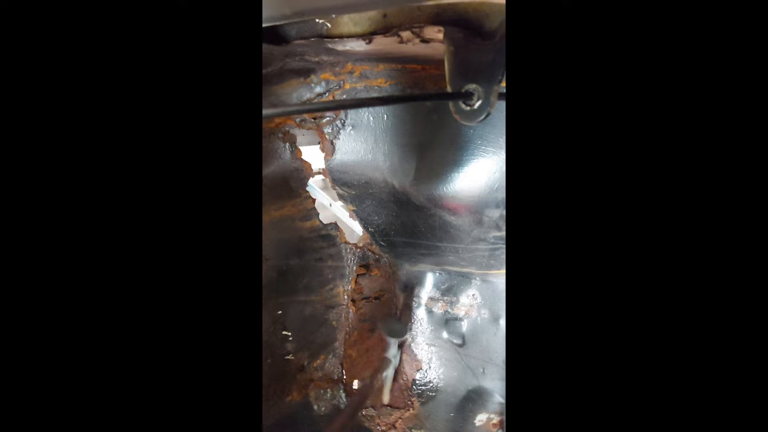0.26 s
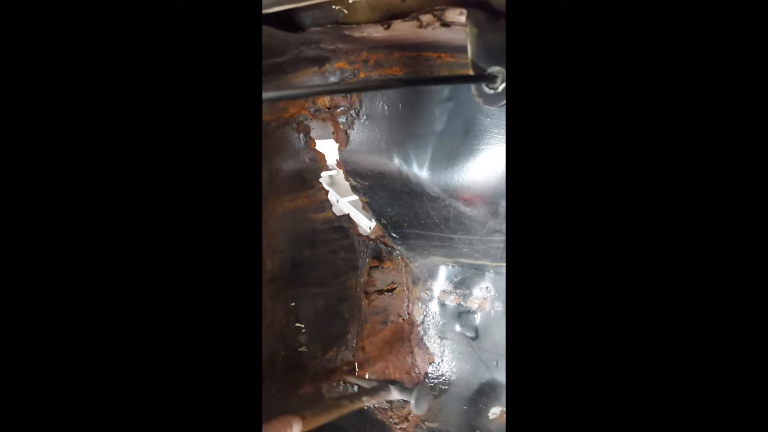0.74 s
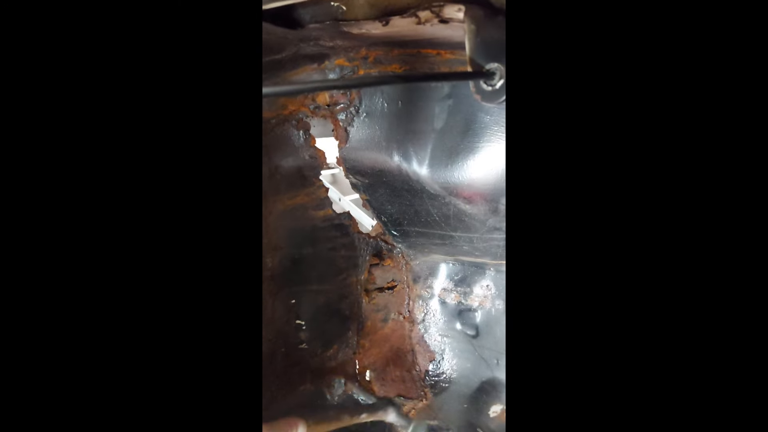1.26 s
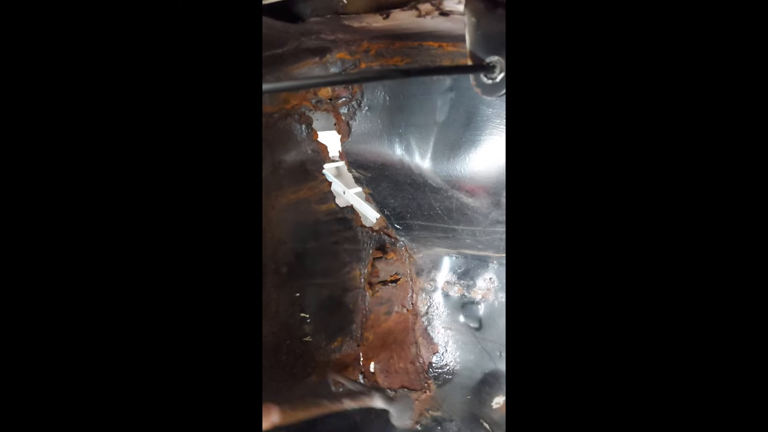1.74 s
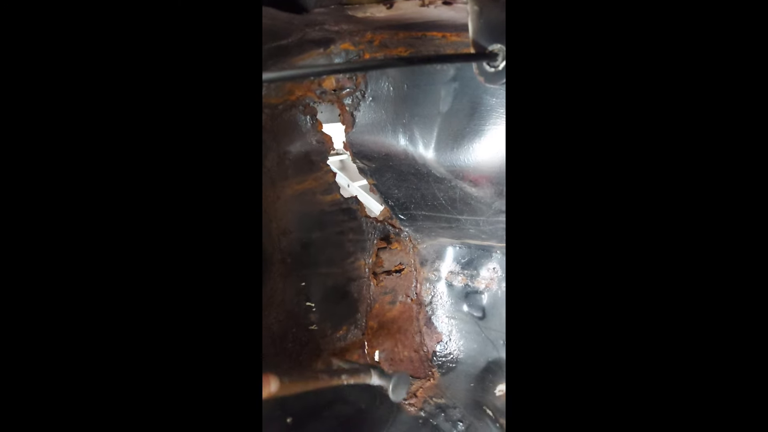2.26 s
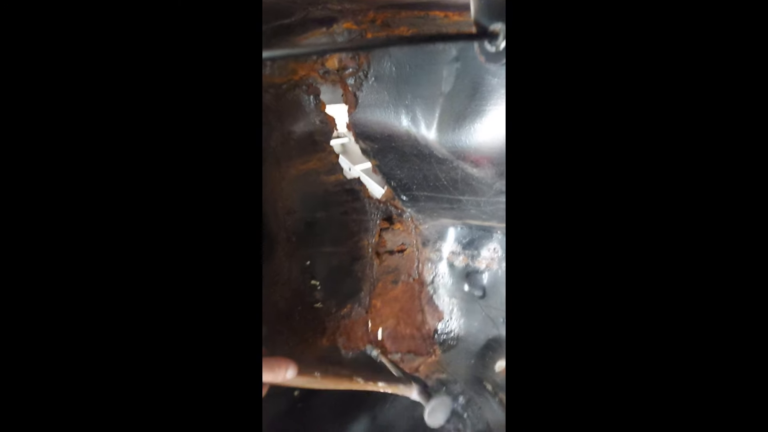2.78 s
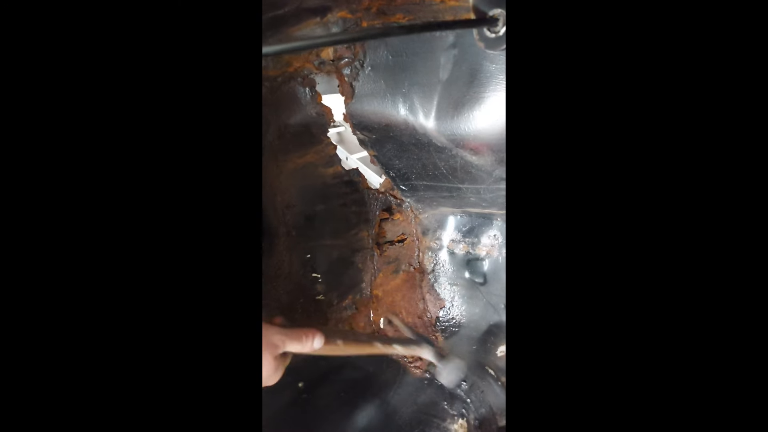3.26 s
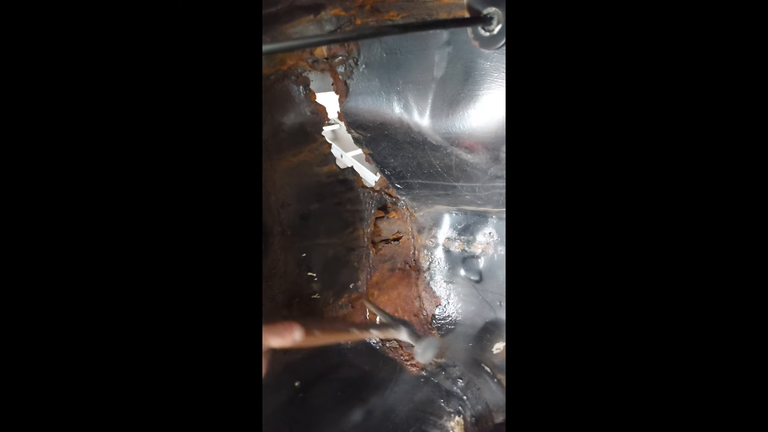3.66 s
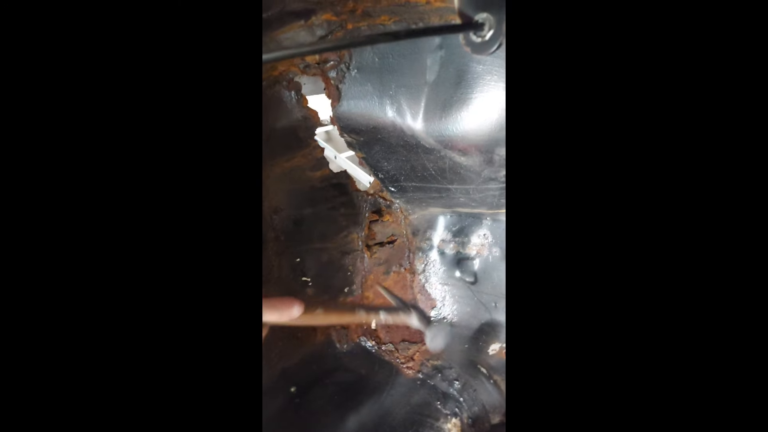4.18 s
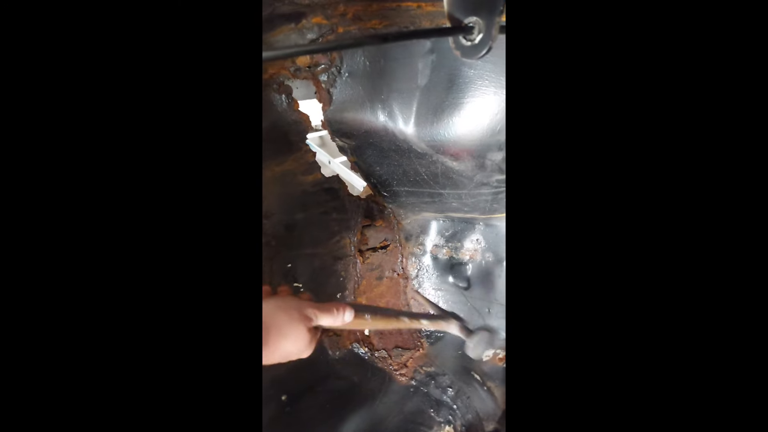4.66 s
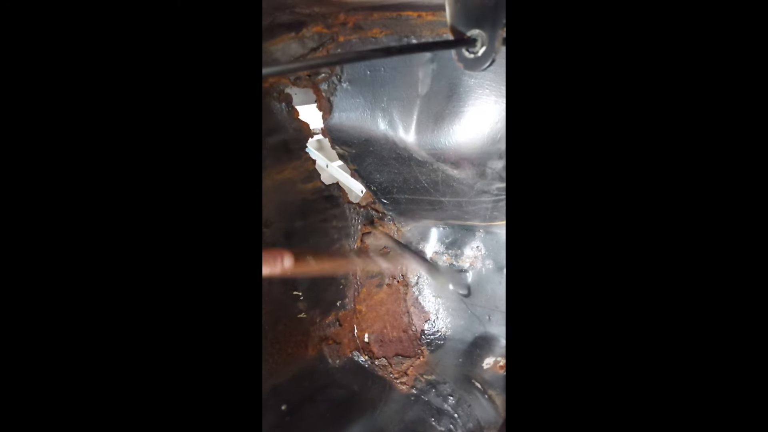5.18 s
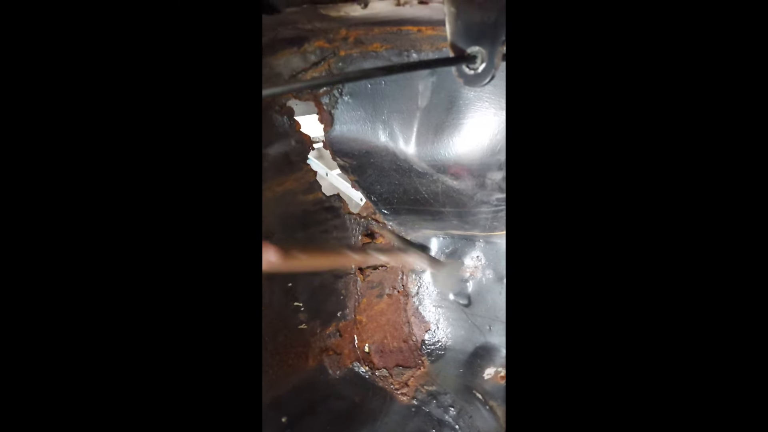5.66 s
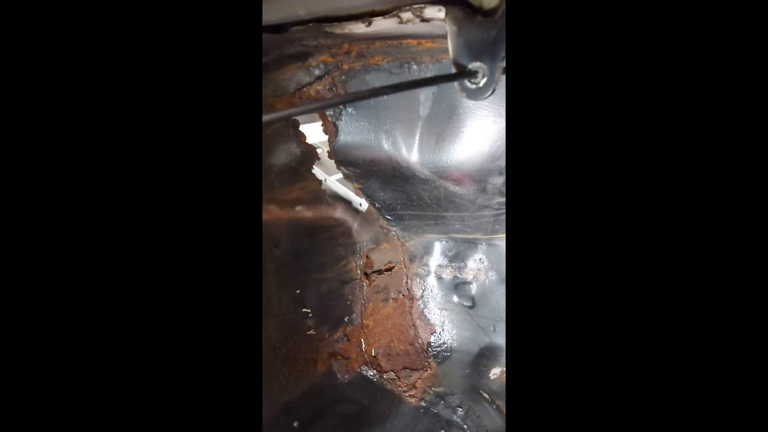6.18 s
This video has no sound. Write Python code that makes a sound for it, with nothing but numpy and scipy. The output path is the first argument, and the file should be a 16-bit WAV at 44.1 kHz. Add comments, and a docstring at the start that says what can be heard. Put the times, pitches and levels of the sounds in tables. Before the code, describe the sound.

A small hammer taps quickly on a rusty steel car panel, each blow cracking and booming, with one short pause and rust trickling down.

```python
"""First you hear a small hammer tap a rusted steel car panel, close by, over a workshop hiss.
It taps about four times a second, with one pause. Each blow cracks, clatters in the corroded sheet
and booms in the car body; loosened rust trickles down. The hiss stops and comes back with a low hum.
Loud blows make an automatic volume control duck the whole sound, and they overload its limiter."""
import sys
import numpy as np
from scipy import signal
from scipy.fft import rfft, irfft, next_fast_len
from scipy.io import wavfile
from scipy.ndimage import uniform_filter1d, minimum_filter1d

SR = 44100
rng = np.random.default_rng(int(sys.argv[2]) if len(sys.argv) > 2 else 0)


def master(y):
    """Save y as 16-bit WAV."""
    cut = np.clip(np.atleast_2d(y).T, -1, 1)
    pcm = np.round(cut * 32767)  # scale
    wavfile.write(sys.argv[1], SR, pcm.astype(np.int16))


N = 283122
TIME = np.arange(N) / SR
AGE = np.arange(26460) / SR  # seconds since one short sound began
ATTACK = AGE < .05
BINS = np.fft.rfftfreq(32768, 1 / SR)  # the frequencies at which filters are set


def amp(db):
    """Turns decibels into a gain."""
    return 10 ** (np.asarray(db) / 20)

def rms(x):
    """The average strength of a signal."""
    return np.sqrt(np.mean(x ** 2) + 1e-20)

def at_pitch(points, hz):
    """Looks up a table between its rows, on a log frequency scale."""
    f, value = np.transpose(points)
    return np.interp(np.log(hz + 1), np.log(f + 1), value)

def envelope(curve):
    """Turns rows of time and level into a gain for every sample."""
    return amp(np.interp(TIME, *np.transpose(curve)))

def add(mix, start_s, sound):
    """Mixes in a short stereo sound and fades out its end."""
    fade = np.minimum((AGE[-1] - AGE) / .2, 1)
    part = mix[:, max(round(start_s * SR), 0):][:, :len(AGE)]
    part += (sound * fade)[:, :part.shape[1]]

def colour(x, db):
    """Filters by one level for each of BINS, with no ringing ahead of the sound."""
    log_gain = np.log(amp(np.concatenate([db, db[-2:0:-1]])))
    taps = np.fft.ifft(np.exp(np.conj(signal.hilbert(log_gain)))).real[:4096]
    return signal.fftconvolve(x, taps[None], axes=1)[:, :x.shape[1]]

# How alike left and right are: f/Hz, likeness (1 = the same)
EAR_LIKENESS = [(150, 1), (300, 0.96), (700, .5), (1400, -0.23), (16000, 0.5)]
def close_mics(pair):
    """Two unrelated noises become alike in the bass, as at two close microphones."""
    left, other = rfft(pair)
    like = np.clip(at_pitch(EAR_LIKENESS, np.fft.rfftfreq(pair.shape[1], 1 / SR)), -1, 1)
    return irfft([left, like * left + np.sqrt(1 - like ** 2) * other], pair.shape[1])

def steady_noise(spectrum):
    """Stereo noise of strength 1 with the given tone colour."""
    white = close_mics(rng.standard_normal((2, next_fast_len(N))))
    noise = colour(white, at_pitch(spectrum, BINS))[:, :N]
    return noise / rms(noise)


# Tone colour of the rumble: f/Hz, relative level/dB
RUMBLE_COLOUR = [(15, -64), (25, -50.5), (70, -3), (151, -11.5), (186, -38), (240, -16.5), (437, -29.5),
                 (537, -35), (659, -26), (1500, -66), (1950, -93), (3300, -120)]
def rumble(level_db=-42.5):
    """The room rumbles, low and steady."""
    return amp(level_db) * steady_noise(RUMBLE_COLOUR)

# How loud the hum is: t/s, level/dB
HUM_LEVEL = [(0, -91), (2.7, -99), (2.77, -38), (2.92, -35), (3.3, -38.5), (6.42, -42.5)]
def hum(pitch_hz=130, waver_hz=3):
    """A low tone comes in partway through, its pitch wavering."""
    drift = uniform_filter1d(rng.standard_normal(N), size=4000)
    hz = pitch_hz + waver_hz * drift / rms(drift)
    return envelope(HUM_LEVEL) * np.sqrt(2) * np.sin(2 * np.pi * np.cumsum(hz) / SR)

# Tone colour of the hiss: f/Hz, relative level/dB
HISS_COLOUR = [(100, -4.5), (250, 1.5), (420, -2), (600, -0.5), (800, -10), (1200, -11.5), (1900, -3.5),
               (2400, -13.5), (3000, -16.5), (4500, -25.5), (6300, -30.5), (9000, -50.5), (16000, -39.5)]
# When it hisses: start t/s, end t/s, relative level/dB, drift/(dB per s)
HISS_TIMES = [(-.1, 2.2, -46.5, -2.5), (2.709, 6.5, -45.5, 0.2)]
def hiss(gain_db=7, rise_s=0.053, fall_db_per_s=51):
    """The hiss comes in quickly, drifts slowly in level and fades when it stops."""
    gain = np.zeros(N)
    for start, end, db, drift in HISS_TIMES:
        rise = np.clip((TIME - start) / rise_s, 0, 1)
        gain += rise * amp(db + drift * (TIME - start) - fall_db_per_s * np.maximum(TIME - end, 0))
    return amp(gain_db) * gain * steady_noise(HISS_COLOUR)

# How crumbly the rust is along the hammer's path: t/s, relative level/dB
CRUMBLINESS = [(0, -0.5), (.55, -0.5), (1.03, -1), (1.4, 8), (2, 2), (3.3, -3), (4.15, -9), (5.05, -2.5),
               (5.4, 2.5), (6.3, 0.5)]
def shedding(gain_db=-38, db_per_boom_db=0.96, t60=3.14):
    """Each boom shakes rust loose, then the trickle thins. A t60 is the seconds taken to fade 60 dB."""
    shaken_db = np.full(N, -120.)
    for start, force_db, give_db, *_ in HAMMER_BLOWS:
        trickle_db = db_per_boom_db * (force_db + give_db) - 60 * (TIME - start) / t60
        shaken_db = np.where(TIME > start, np.maximum(shaken_db, trickle_db), shaken_db)
    return envelope(CRUMBLINESS) * amp(gain_db + shaken_db)

# Single flakes landing: t/s, relative level/dB
FLAKE_DROPS = [(0.8705, -30), (1.1638, -35), (1.213, -30), (1.477, -29.5), (1.7369, -20), (2.228, -29),
               (2.271, -29.5), (2.3083, -40), (2.4713, -48), (2.5107, -44), (2.7, -27.5), (2.725, -32.5),
               (3.3123, -32.5), (3.3785, -27), (3.8373, -35), (5.8764, -39), (5.912, -35.5), (6.309, -27.5)]
# Tone colour of all falling rust: f/Hz, relative level/dB
RUST_COLOUR = [(200, -16.5), (700, 18), (1300, 4), (2200, 12.5), (4000, 1.5), (6400, 0.5), (9500, -22),
               (13500, -4.5), (16000, -7)]
def falling_rust(flake_db=-3.5, flake_t60=0.088, grains_per_s=140, spread_db=4, tail_db=-19, tail_t60=1):
    """Flakes and fine grains tick on the sheet below; each grain leaves a faint tail."""
    flakes = np.zeros((2, N))
    for start, db in FLAKE_DROPS:
        decay = amp(db + flake_db - 60 * AGE / flake_t60)
        add(flakes, start, decay * rng.standard_normal((2, len(AGE))))
    lands = rng.random(N) < grains_per_s / SR
    sizes = amp(spread_db * np.minimum(rng.exponential(1, N), 3))
    grains = lands * sizes * rng.standard_normal((2, N))
    tick = amp(-60 * AGE / .025)
    landing = (tick + amp(tail_db - 60 * AGE / tail_t60)) * rng.standard_normal((2, len(AGE)))
    trickle = signal.fftconvolve(grains, landing, axes=1)[:, :N]
    return colour(flakes + shedding() * trickle / rms(trickle), at_pitch(RUST_COLOUR, BINS))

# Borders of a blow's six pitch bands (boom, body, clang, clack, crack, tick): f/Hz
BAND_EDGES = [50, 180, 450, 1000, 3000, 8000, 16000]
# The notes the panel and car body ring at: f/Hz, relative level/dB, t60/s
PANEL_NOTES = [(50.4, -16, 0.74), (60.6, -8, 0.45), (70.77, -6.5, 0.58), (85.1, -24, 0.83),
               (102.15, -3, 0.41), (108.4, 8.5, 0.17), (129.6, 0, 0.25), (148.06, 5, 0.18),
               (152.85, -9, 0.48), (197.6, -12, 0.56), (217.5, 1.5, 0.21), (232.7, 14.5, 0.092),
               (248.7, 3, 0.23), (278, -8, 0.52), (320.2, -5.5, 0.29), (327.8, -6, 0.18),
               (348.2, -9.5, 0.54), (373.4, 4, 0.27), (399.5, -15, 0.72), (424.4, -15, 0.76),
               (505, 0.5, 0.4), (495, -30, 0.064), (521.4, 7.5, 0.16), (547, 7.5, 0.3), (630, -21, 0.99),
               (662, -4, 0.46), (675, 16, 0.11), (814, -26, 0.083), (872, 16, 0.064)]
def panel_boom(band_db, spot_hz, spot_db=10, width_hz=36, scatter_db=2, swell_s=0.015, mic_lag_s=0.00037):
    """A blow starts all the low notes at once; those near the struck spot's pitch get a boost."""
    hz, db, t60 = np.transpose(PANEL_NOTES)
    chance = rng.standard_normal((len(hz), 2))
    nearness = 1 / (1 + (2 * (hz - spot_hz) / width_hz) ** 2)
    size = amp(db + spot_db * nearness + scatter_db * chance[:, 0] * np.sqrt(hz / 300))
    lag = chance[:, 1] * hz / 900  # short waves arrive out of step, depending on the spot
    turn_and_decay = 2j * np.pi * hz - np.log(1000) / t60
    rings = size[:, None] * np.exp(turn_and_decay[:, None] * AGE + 1j * lag[:, None])
    is_boom = hz[:, None] < BAND_EDGES[1]
    rings *= np.where(is_boom, 1 - np.exp(-AGE / swell_s), 1)  # the boom takes time to spread
    ears = np.exp(1j * np.pi * mic_lag_s * np.outer([-1, 1], hz) * np.where(is_boom.T, .4, 1))
    out = np.zeros((2, len(AGE)))
    for band, trim_db in enumerate((1, 0, -3)):  # boom, body, clang
        inside = np.digitize(hz, BAND_EDGES[1:3]) == band
        part = -(ears[:, inside] @ rings[inside]).imag
        out += part * amp(band_db[band] + trim_db) / rms(part[:, ATTACK])
    return out

def dying_noise(t60_table):
    """Stereo noise in which each frequency fades at its own speed."""
    hz, t, spectrum = signal.stft(rng.standard_normal((2, len(AGE))), SR, nperseg=128)
    decay = amp(-60 * t / at_pitch(t60_table, hz)[:, None])
    return signal.istft(spectrum * decay, SR, nperseg=128)[1][:, :len(AGE)]

# Tone colour of the sheet's countless higher notes: f/Hz, level/dB added to the bands
SHEET_COLOUR = [(40, -25), (200, -12), (450, -4.5), (800, -4.5), (1400, 0), (2100, 4), (3000, 3), (4500, 2),
                (6500, 6), (8000, -4), (9700, -11), (12000, 3), (14000, 2), (16000, 5.5)]
# How long the sheet and the workshop ring: f/Hz, t60/s
SHEET_DECAY = [(200, 0.52), (700, 0.16), (1700, 0.11), (4500, 0.079), (9000, 0.063), (14000, 0.072)]
ROOM_DECAY = [(200, 0.55), (700, 0.91), (2000, 0.42), (6000, .25), (14000, 0.11)]
NOISE_LEAD_S = .007  # a faint noise swells for this long just before each blow
def clatter(band_db, crack_s, room_db, crack_db=6, swell_s=0.0022, lumpy_db=3, gain_db=2):
    """A faint noise swells into a rough crack, then the sheet rattles and the workshop echoes."""
    since_peak = AGE - NOISE_LEAD_S
    lumps = uniform_filter1d(rng.standard_normal(len(AGE)), size=40)
    outline = np.exp(np.minimum(since_peak / swell_s, -since_peak / crack_s))
    outline *= amp(lumpy_db * lumps / rms(lumps))
    crack = amp(crack_db) * outline * rng.standard_normal((2, len(AGE)))
    ringing = dying_noise(SHEET_DECAY) + amp(room_db) * dying_noise(ROOM_DECAY)
    ringing *= amp(0.034 * (band_db[3] - band_db[0]))  # loose sheet rattles more than it booms
    ringing = np.pad(ringing, ((0, 0), (round(NOISE_LEAD_S * SR), 0)))[:, :len(AGE)]
    burst = close_mics(crack + ringing)
    edges = np.array(BAND_EDGES)
    centres_hz = np.sqrt(edges[1:] * edges[:-1])
    density_db = band_db - 10 * np.log10(np.diff(edges) / (SR / 2))
    shape_db = at_pitch(np.column_stack([centres_hz, density_db]), BINS) + at_pitch(SHEET_COLOUR, BINS)
    return colour(burst / rms(burst[:, ATTACK]), shape_db + gain_db)

# The thin notes of solid steel: f/Hz, relative level/dB, t60/s
STEEL_NOTES = [(2100, 6, 0.48), (2850, 16, 0.21), (4810, -30, 0.43), (6260, 7.5, 0.076), (10762, -20, 0.14),
               (15700, -33, .18)]
def steel_ring(low_db, high_db, low_gain_db=3, high_gain_db=14, split_hz=9):
    """A clean hit on solid metal rings in pairs of notes so close in pitch that they throb."""
    hz, db, t60 = np.transpose(STEEL_NOTES + STEEL_NOTES)[:, :, None, None]
    db = db + np.where(hz < BAND_EDGES[4], low_db + low_gain_db, high_db + high_gain_db)
    hz = hz + split_hz * rng.standard_normal(hz.shape)
    phase = 2 * np.pi * rng.random(hz.shape) + rng.standard_normal((len(hz), 2, 1))
    return np.sum(amp(db - 60 * AGE / t60) * np.sin(2 * np.pi * hz * AGE + phase), axis=0)

def struck_spot(hz, db, t60, split_hz):
    """The patch of sheet under the head rings briefly at three close pitches."""
    cluster = hz + split_hz * np.array([-1, 0, 1]) * rng.uniform(0.54, 2.21, 3)
    phase = 2 * np.pi * rng.random((3, 1)) + hz / 1500 * rng.standard_normal((2, 3, 1))
    ring = np.array([.45, 1, .45]) @ np.sin(2 * np.pi * cluster[:, None] * AGE + phase)
    ring *= amp(-60 * AGE / t60) * (1 - np.exp(-AGE * hz))
    return amp(db) * ring / rms(ring[:, ATTACK])

def dent(force_db, gain_db=17, swing_hz=340, peak_s=0.00058):
    """The sheet gives under the head and springs back: one hard swing each way."""
    push = AGE / peak_s * np.exp(1 - AGE / peak_s)
    return -amp(force_db + gain_db) * push * np.sin(2 * np.pi * swing_hz * AGE)

# One row a blow: t/s, force/dB, give of the car body/dB, hardness of the spot/dB, main f/Hz,
# knock f/Hz, knock level/dB, clank f/Hz, clank level/dB. Later dB columns count from the force.
HAMMER_BLOWS = [(0.0301, -18.5, -14, 2, 340, 630, -3, 1834, -2),
                (0.2755, -15, -11.5, 0.5, 249.5, 549, -2, 1520, -5.5),
                (0.524, -24, 3, 12.5, 222.6, 1280, -23, 2080, 10),
                (0.764, -15.5, 5.5, 1, 361, 1090, -12, 1700, -48),
                (1.0254, -12, 4.5, -7, 333, 740, -22, 1820, -12),
                (1.273, -12.5, 3, -4.5, 323.4, 723, 1.5, 2104, -8.5),
                (1.5672, -11, -0.5, -7.5, 242.7, 590, -28, 1747, -6.5),
                (1.818, -13, 2.5, -11, 331, 600, -15, 2070, -17.5),
                (2.0699, -9.5, -2, -15, 346.6, 662, -14, 2080, -22),
                (2.164, -24.5, 7.5, -11, 381.6, 584, -7, 2100, -27),
                (2.211, -41.5, 9, 9, 356, 590, -10, 2400, -12),
                (2.9504, -13.5, 7.5, -6, 337, 545, -10, 2450, -16),
                (3.213, -14.5, 8.5, 1, 392, 660, -18.5, 1730, -16),
                (3.4464, -12.5, 6, -10, 364.3, 550, -6, 1630, -22),
                (3.676, -18, 0.5, 3, 387, 854, -12, 1964, -10),
                (3.9162, -17, 0.5, 3, 522, 545, -0.5, 1560, -21),
                (4.1204, -11.5, -10, 0, 379, 1000, -27, 1637, -15),
                (4.375, -11, -9.5, -5, 368, 662, -23, 1585, -18),
                (4.5976, -11.5, -2.5, -2, 224.6, 536, -7.5, 1760, -18.5),
                (4.8147, -12, -2, -1, 362.4, 680, -15, 1655, -7),
                (5.0403, -25.5, -14, 21.5, 526, 863, 0, 1600, -12),
                (5.268, -15, -7.5, 0.5, 225.8, 640, -14.5, 2110, -11),
                (5.5136, -22, 4, 4.5, 228, 656, 6.5, 2870, -7),
                (5.757, -16.5, 3, -1, 513, 1090, -4.5, 2240, -10.5),
                (5.9925, -17.5, -4.5, 1, 351.7, 551, -3.5, 2300, -8.5),
                (6.259, -16.5, -3, 5, 356.5, 872, 0, 2755, -8)]
# One row a band, boom to tick: level/dB added to the force, then how much it follows
# give, hardness, knock, clank and crumbliness (dB per dB)
BAND_RECIPE = [(-0.5, 0.97, 0.15, 0, 0.0064, 0.024), (0.2, 0.046, 0.17, 0, 0, 0.16),
               (-1.5, 0, 0.11, 0.38, 0.049, 0.1), (-6.5, 0.034, 0.63, 0.034, 0.089, 0.034),
               (-20, 0.27, 0.87, 0.02, 0, 0.18), (-25.5, 0.36, 0.92, 0, 0.013, 1)]
# Hits that find solid steel: t/s, low notes' relative level/dB, high notes' relative level/dB
STEEL_HITS = [(0.524, -55, -68), (1.272, -49.5, -44), (5.0411, -50.5, -48.5), (5.269, -73, -59),
              (5.9935, -74, -48), (6.258, -44, -53)]
def hammer():
    """Every blow dents the panel and makes it ring and clatter; a few also ring solid steel."""
    out = np.zeros((2, N))
    base_db, *shares = np.transpose(BAND_RECIPE)
    for t, force_db, give_db, hard_db, main_hz, knock_hz, knock_db, clank_hz, clank_db in HAMMER_BLOWS:
        crumbly_db = np.interp(t, *np.transpose(CRUMBLINESS))
        band_db = force_db + base_db + np.dot([give_db, hard_db, knock_db, clank_db, crumbly_db], shares)
        # the hollow main note is clearer where the body gives little
        note = struck_spot(main_hz, force_db - 8.5 - 0.24 * give_db, t60=0.22, split_hz=3.3)
        knock = struck_spot(knock_hz, force_db + knock_db - 1.5, t60=0.082, split_hz=41.6)
        clank = struck_spot(clank_hz, force_db + clank_db, t60=0.028, split_hz=95)
        add(out, t, dent(force_db) + panel_boom(band_db, main_hz) + note + knock + clank)
        # a hard spot gives a shorter crack and a louder tail
        rattle = clatter(band_db, crack_s=0.0044 * amp(-0.2 * hard_db), room_db=-22 + 0.28 * hard_db)
        add(out, t - NOISE_LEAD_S, rattle)
    for t, low_db, high_db in STEEL_HITS:
        add(out, t, steel_ring(low_db, high_db))
    return out

# How far the sound leans left: f/Hz, left minus right level/dB
LEFT_LEAN = [(100, 0), (350, 1), (700, -1.3), (1400, 1.7), (2800, 4.5), (5600, 4.3), (10000, 9),
             (14000, 13)]
def scene(hammer_db=5):
    """Hammer, rust and workshop reach two microphones; the right one is shaded from the treble."""
    mix = amp(hammer_db) * hammer() + falling_rust() + hum() + rumble() + hiss()
    lean_db = at_pitch(LEFT_LEAN, BINS)
    left_db = -10 * np.log10((1 + amp(-2 * lean_db)) / 2)  # keeps the total power the same
    return np.vstack([colour(mix[:1], left_db), colour(mix[1:], left_db - lean_db)])

def hold_peaks(db, recovery_db_per_s):
    """Jumps up with each peak, then sinks at a steady rate."""
    fall = TIME * recovery_db_per_s
    return np.maximum.accumulate(db + fall) - fall

def gain_control(x, threshold_db=-12, most_db=6.5, attack_s=0.0013):
    """A loud blow turns the volume down a few dB; the background swells back until the next one."""
    power_db = 10 * np.log10(abs(uniform_filter1d((x ** 2).mean(0), size=440)) + 1e-12)
    duck_db = hold_peaks(np.clip(power_db - threshold_db, 0, most_db), recovery_db_per_s=16)
    keep = np.exp(-1 / (attack_s * SR))
    return x * amp(-signal.lfilter([1 - keep], [1, -keep], duck_db))

def limiter(x, ceiling_db=1.22):
    """A very fast dip in volume and slight clipping flatten the first swings of a loud blow."""
    over_db = np.maximum(20 * np.log10(abs(x).max(0) + 1e-9) - ceiling_db, 0)
    ahead_db = -minimum_filter1d(-over_db, size=40)  # sees peaks coming
    duck_db = uniform_filter1d(hold_peaks(ahead_db, recovery_db_per_s=700), size=40)
    return np.clip(x * amp(-duck_db), -1, 1)

def record(dry, low_cut_hz=49, high_cut_hz=16100):
    """Ducks the volume, cuts the deepest bass, limits the peaks, then cuts the highest treble."""
    low_cut = signal.butter(2, low_cut_hz, "high", fs=SR, output="sos")
    high_cut = signal.firwin(511, high_cut_hz, window=("kaiser", 9), fs=SR)
    limited = limiter(signal.sosfilt(low_cut, gain_control(dry)))
    return signal.oaconvolve(limited, high_cut[None], "same")


dry = scene()
out = record(dry)
master(out)
```